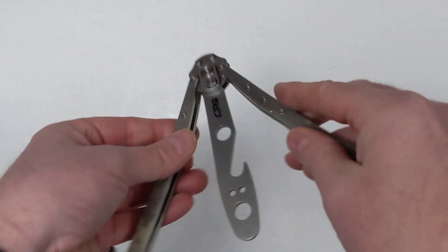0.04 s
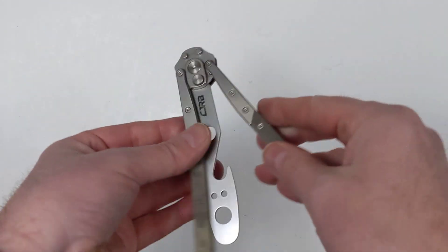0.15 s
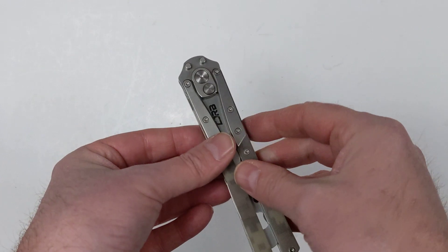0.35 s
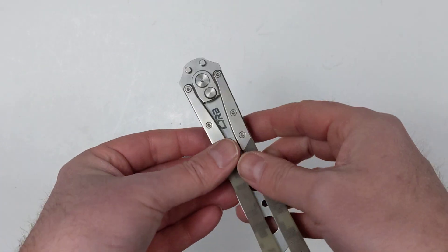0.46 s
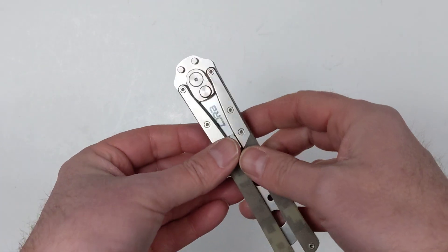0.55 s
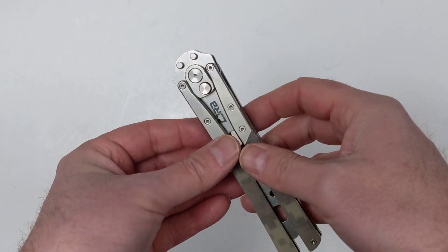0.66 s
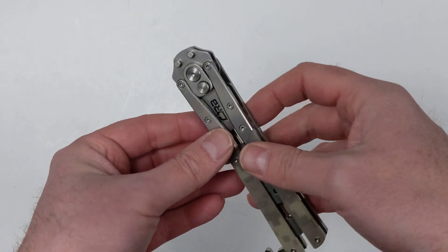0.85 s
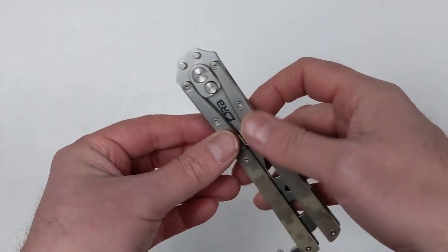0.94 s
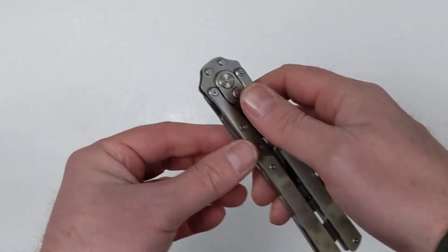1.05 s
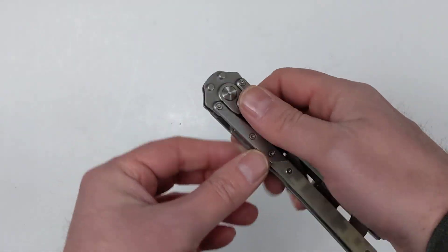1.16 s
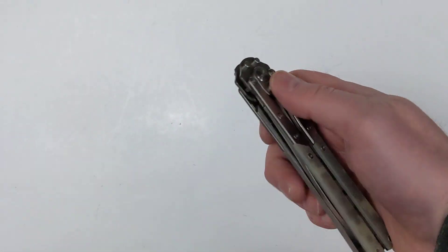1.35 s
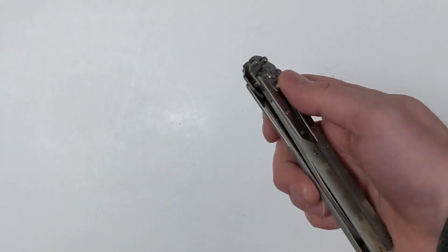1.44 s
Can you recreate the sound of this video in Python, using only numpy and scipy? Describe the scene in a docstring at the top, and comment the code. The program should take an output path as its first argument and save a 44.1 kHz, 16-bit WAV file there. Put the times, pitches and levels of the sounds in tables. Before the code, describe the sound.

Sharp metal clacks and faint ticks from a butterfly knife being closed by hand.

```python
"""Two hands fold a steel butterfly-knife trainer shut over a desk, in a small room with a low rumble.
The pivots rub, then the handles clack against the blade and chatter after the hardest blow.
Fingers damp the steel, so each ring is brief. After a lull the pivots rub and the handles clack again.
Last, the grip changes: skin rustles on steel and the loose latch ticks."""
import sys
import numpy as np
from scipy import signal
from scipy.fft import rfft, irfft
from scipy.io import wavfile

SR = 44100
rng = np.random.default_rng(int(sys.argv[2]) if len(sys.argv) > 2 else 0)


def materialize(psi):
    """Save the field psi as 16-bit PCM at rate SR to the path in sys.argv[1].

    A 1-D psi becomes a single channel; in a 2-D psi each row is a channel.
    """
    bounded = np.clip(np.atleast_2d(psi).T, -1, 1)
    quanta = np.round(bounded * 32767).astype(np.int16)
    wavfile.write(sys.argv[1], SR, quanta)


N = 66150
T = np.arange(N) / SR


def undb(db):
    """Decibels to gain."""
    return 10 ** (np.asarray(db) / 20)


def unit(x):
    """Scale to unit energy."""
    return x / np.sqrt(np.sum(x ** 2, axis=-1, keepdims=True))


def decay(t60_s):
    """Exponential decay from time zero."""
    return np.exp(-np.log(1000) * T / max(t60_s, 1e-4))


def envelope(rows):
    """Gain over time from (time_s, level_db) rows."""
    return undb(np.interp(T, *np.array(rows).T))


def over_hz(rows):
    """Interpolate (freq_hz, value) rows onto the FFT bins."""
    hz, value = np.array(rows).T
    bins_hz = np.arange(N + 1) * SR / (2 * N)
    return np.interp(np.log(bins_hz + 1), np.log(hz), value)


def colour(x, spectrum):
    """Minimum-phase filter from (freq_hz, gain_db) rows."""
    cepstrum = irfft(np.log(undb(over_hz(spectrum))))
    causal_fold = np.r_[1, np.full(N - 1, 2), 1, np.zeros(N - 1)]
    response = np.exp(rfft(cepstrum * causal_fold))
    return irfft(rfft(x, 2 * N) * response)[..., :N]


def steady(x, spectrum):
    """Filter, then scale to rms 1."""
    return unit(colour(x, spectrum)) * np.sqrt(N)


def delay(x, delay_s):
    """Delay by whole samples."""
    k = int(np.clip(round(delay_s * SR), 0, N - 1))
    return np.concatenate([np.zeros(x.shape[:-1] + (k,)), x[..., :N - k]], axis=-1)


def place(x, right_db, lag_s=0.00025):
    """A source on the right reaches the left channel later and weaker."""
    return np.array([delay(x, lag_s) * undb(-right_db / 2), x * undb(right_db / 2)])


def reflections(x, level_db, t60_s, delay_s):
    """Diffuse tail, different in each channel."""
    tail = delay(unit(rng.standard_normal((2, N)) * decay(t60_s)), delay_s)
    return undb(level_db) * signal.fftconvolve(x[None], tail, axes=1)[:, :N]


def desk_scatter(x, level_db):
    """Early reflections off hands and desk."""
    return reflections(x, level_db, t60_s=0.043, delay_s=0.0004)


def reverb(x):
    """Hands and desk scatter the sound, then the room answers."""
    return desk_scatter(x, level_db=-2) + reflections(x, level_db=-8.5, t60_s=0.078, delay_s=0.0045)


# rumble spectrum: freq_hz, gain_db
RUMBLE_SPECTRUM = [(20, -23), (38, -22.5), (55, -10), (80, -1), (125, -2.5), (170, -6.5), (250, -7.5),
                   (300, -16), (370, -12), (550, -21.5), (780, -25), (950, -39), (3000, -68.5)]
# rumble left-right likeness: freq_hz, correlation
RUMBLE_CORRELATION = [(30, .6), (70, 1), (140, 0.55), (300, .55), (700, 0.49), (2000, 0.034),
                      (15000, 0.033)]
# rumble envelope: time_s, level_db
RUMBLE_LEVEL = [(0, -66.5), (.3, -66), (.55, -66.5), (.88, -65.5), (1.05, -68), (1.5, -68.5)]
# hiss spectrum: freq_hz, gain_db
HISS_SPECTRUM = [(200, -13), (950, 2), (1150, 12), (1400, 8.5), (1600, -2.5), (2250, 4), (2700, -0.5),
                 (5700, -1.5), (8100, .5), (10100, -4), (15500, -2), (16200, -23)]


def room_tone(hum_hz=122.4, hum_db=-78, hiss_db=-77):
    """Gently swelling rumble, alike on both sides in the bass, with faint hum and hiss."""
    correlation = np.clip(over_hz(RUMBLE_CORRELATION), -0.99, 0.99)
    noise_bins = rfft(rng.standard_normal((2, 2 * N)))
    mid, side = irfft(noise_bins * np.sqrt([1 + correlation, 1 - correlation]))[:, :N]
    rumble = envelope(RUMBLE_LEVEL) * steady(np.array([mid + side, mid - side]), RUMBLE_SPECTRUM)
    hum = np.sqrt(2) * undb(hum_db) * np.sin(2 * np.pi * hum_hz * T)
    hiss = undb(hiss_db) * steady(rng.standard_normal((2, N)), HISS_SPECTRUM)
    return rumble + hum + hiss


def friction(spectrum, rate_per_s, spread_db, right_db, scatter_db):
    """Tiny random contacts of uneven size, direct plus desk scatter, at rms 1."""
    sizes = undb(spread_db * np.minimum(rng.exponential(size=N), 3))
    slips = (rng.random(N) < rate_per_s / SR) * sizes * rng.choice([-1, 1], N)
    rub = colour(place(slips, right_db) + desk_scatter(slips, scatter_db), spectrum)
    return rub / np.sqrt(np.mean(rub ** 2))


# pivot friction envelope: time_s, level_db
PIVOT_LEVEL = [(0, -68.5), (.05, -68.5), (.11, -69), (.15, -65), (.2, -78), (.23, -70.5), (.27, -63),
               (.36, -68), (.41, -73), (.45, -105), (.92, -100), (.98, -80.5), (1.04, -81), (1.08, -58),
               (1.14, -81)]
# pivot friction spectrum: freq_hz, gain_db
PIVOT_SPECTRUM = [(400, -7), (1600, -10.5), (2200, -4), (2900, -6), (4500, -15.5), (6000, -3), (7200, 2),
                  (8600, -4.5), (10200, -9), (12000, -5), (14000, -3.5), (16000, -18.5)]


def pivot_rub():
    """The pivots slip in fine, dense steps while the handles swing."""
    rub = friction(PIVOT_SPECTRUM, rate_per_s=2800, spread_db=1, right_db=6, scatter_db=1.5)
    return envelope(PIVOT_LEVEL) * rub


def ring(modes, t60_scale, spread_db=1.5):
    """Struck modes, neighbours in opposite phase; each blow favours different ones."""
    shares = undb(spread_db * rng.standard_normal(len(modes)))
    partials = (
        (-1) ** k * shares[k] * undb(db) * np.sin(2 * np.pi * hz * T) * decay(t60_s * t60_scale)
        for k, (hz, db, t60_s) in enumerate(modes))
    return unit(sum(partials))


# steel contact spectrum: freq_hz, gain_db
CONTACT_SPECTRUM = [(200, -32), (900, -31.5), (1600, -15.5), (4000, -14), (5700, -1), (8300, -1.5),
                    (10500, -9), (13300, -1.5), (15000, -11), (16000, -36.5)]


def contact_snap():
    """First clean pulse of steel meeting steel."""
    return unit(colour(signal.unit_impulse(N), CONTACT_SPECTRUM))


def contact_crack(t60_s):
    """Decaying burst of contact noise."""
    return unit(colour(rng.standard_normal(N) * decay(t60_s), CONTACT_SPECTRUM))


# hand-damped handle modes: pitch_hz, gain_db, t60_s
HANDLE_MODES = [(1600, -21, .012), (2020, -20, .02), (3220, -15, .012), (5144, -15, 0.021),
                (5860, -7, .011), (6950, -6, 0.01206), (8316, -6, .012), (9020, -1, 0.0083),
                (10360, -7, .008), (11940, -8, .009), (13390, -8.5, 0.0092), (14020, -1, 0.0098),
                (14150, -17.5, .006), (14850, -13, 0.011)]
# clack tint bands: freq_hz
TINT_BANDS_HZ = [1700, 2700, 5000, 8300, 13500]
# handle blows: start_s, gain_db, tint_db (5 bands), t60_scale, right_db, send_db
HANDLE_BLOWS = [(0.2428, -21.5, -0.5, 2.5, -6, 0, 4, 0.72, 8.5, -10),
                (0.2456, -13.5, -2, -10.5, -5.5, 2.5, -1, 1.1, 7.5, 0.5),
                (.2950, -2, -5, -13, -3, -6, 7, .8, 9, -11),
                (0.3756, -28, -16, 1, 3.5, 0, -7, 1.2, 6, -0.5),
                (0.5078, -38.5, -4, -1.5, -2, -2, -3, 0.57, 11.5, -1),
                (.7747, -40.5, -12, -4, 3, -4, 1, 1.5, 7, -2),
                (1.0723, -17, -15, -21.5, 3, -1.5, 3.5, .8, 10.5, -4),
                (1.0732, -18.5, -5.5, 6, 0, 1.5, -4.5, 1.04, 2, -2.5),
                (1.1718, -32, 3, 6.5, 0, 0, -5, 0.87, 7.5, -3.5),
                (1.2371, -36, -16, 9.5, -11.5, 4.5, -1.5, 0.95, 7, -2.5)]


def handle_clacks(snap_db=-8.5, crack_db=-2, crack_t60_s=0.0052):
    """Handles hit the blade: snap, crack and brief ring, tinted by where the blow lands."""
    direct, send = 0, 0
    snap = undb(snap_db) * contact_snap()
    for start_s, gain_db, *tint_db, t60_scale, right_db, send_db in HANDLE_BLOWS:
        ringing = ring(HANDLE_MODES, t60_scale)
        crack = undb(crack_db) * contact_crack(crack_t60_s * t60_scale)
        clack = colour(snap + ringing + crack, list(zip(TINT_BANDS_HZ, tint_db)))
        clack = delay(clack, start_s) * undb(gain_db)
        direct += place(clack, right_db)
        send += clack * undb(send_db)
    return direct + reverb(send)


# chatter spectrum: freq_hz, gain_db
CHATTER_SPECTRUM = [(300, -24), (900, -23), (1500, -11), (2000, -1.5), (2300, -15), (2850, -16.5),
                    (3300, -8.5), (4200, -9.5), (5800, 1), (7400, -2.5), (8600, -0.5), (10500, -6.5),
                    (13400, 2), (15200, 1), (16000, -21.5)]


def handle_chatter(start_s=0.299, onset_db=-39, sag_db_per_s=196, hold_s=0.033, stop_db_per_s=499):
    """The handles buzz against the blade, sag, then quickly come to rest."""
    age_s = T - start_s
    sag_db = sag_db_per_s * np.maximum(age_s, 0)
    stop_db = stop_db_per_s * np.maximum(age_s - hold_s, 0)
    buzz = friction(CHATTER_SPECTRUM, rate_per_s=1200, spread_db=2.7, right_db=1.1, scatter_db=5.7)
    return (age_s > 0) * undb(onset_db - sag_db - stop_db) * buzz


# skin friction envelope: time_s, level_db
SKIN_LEVEL = [(1.08, -120), (1.13, -85), (1.2, -75.5), (1.28, -76.5), (1.32, -67), (1.34, -63.5),
              (1.38, -66), (1.41, -72.5), (1.44, -71.5), (1.5, -69)]
# skin friction spectrum: freq_hz, gain_db
SKIN_SPECTRUM = [(200, -5), (800, 8), (1300, 1), (1800, -6.5), (2500, 6.5), (3300, 3), (4100, -7.5),
                 (5500, 2), (8200, -0.5), (10000, -2), (13000, -9), (16000, -9.5)]


def finger_rustle():
    """Skin slides over steel to a new grip in coarse, uneven slips."""
    rustle = friction(SKIN_SPECTRUM, rate_per_s=700, spread_db=5, right_db=1, scatter_db=2.5)
    return envelope(SKIN_LEVEL) * rustle


# latch modes: pitch_hz, gain_db, t60_s
LATCH_MODES = [(2805, -6.5, 0.038), (3190, 1, 0.016), (7070, -5, 0.0093), (8080, 3, 0.011),
               (8200, 0.5, .018), (8900, -6, 0.0097), (12200, -24, .01), (15100, -22.5, .02)]
# latch taps: start_s, gain_db, contact_s
LATCH_TAPS = [(1.2968, -47.5, .01), (1.3297, -39.5, 0.035), (1.3345, -42.5, 0.024), (1.3392, -45, 0.01),
              (1.3555, -42.5, 0.0083), (1.3615, -41, .003), (1.3803, -52, .008), (1.3963, -49, 0.0043),
              (1.4595, -34, 0.0022), (1.4872, -37.5, 0.0056), (1.4935, -45, .003)]


def latch_ticks(scrape_db=-3.5, contact_ref_s=0.0063):
    """The loose latch taps the handle; longer contacts scrape more."""
    ticks = 0
    for start_s, gain_db, contact_s in LATCH_TAPS:
        ringing = ring(LATCH_MODES, t60_scale=0.93)
        scrape_gain = undb(scrape_db) * np.sqrt(contact_s / contact_ref_s)
        scrape = scrape_gain * contact_crack(t60_s=2 * contact_s)
        ticks += delay(ringing + scrape, start_s) * undb(gain_db)
    return place(ticks, right_db=8) + reverb(ticks)


def scene():
    """Knife, hands and room in stereo."""
    impacts = handle_clacks() + latch_ticks() + handle_chatter()
    rubbing = pivot_rub() + finger_rustle()
    return impacts + rubbing + room_tone()


def record(dry):
    """Steep low-pass on the top treble."""
    cutoff_hz = 15800
    lowpass = signal.ellip(8, 0.2, 70, cutoff_hz, fs=SR, output="sos")
    return signal.sosfilt(lowpass, dry)


dry = scene()
out = record(dry)
materialize(out)
```